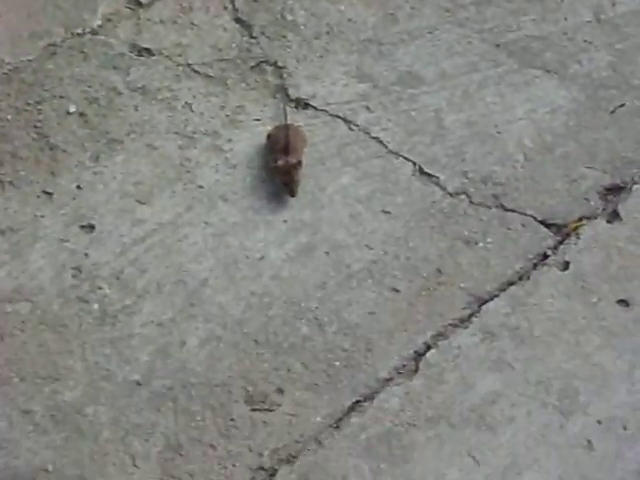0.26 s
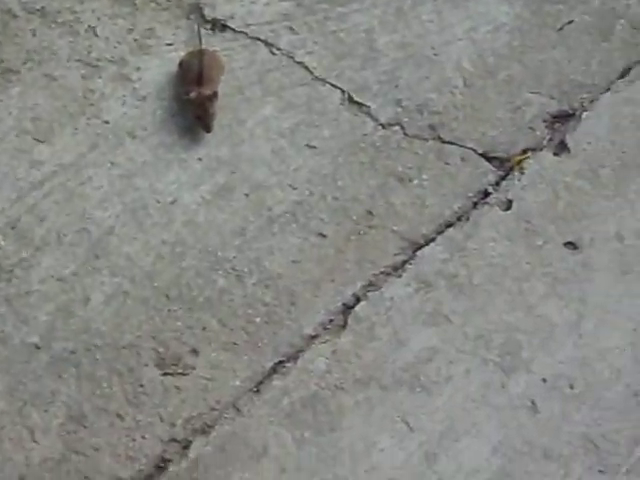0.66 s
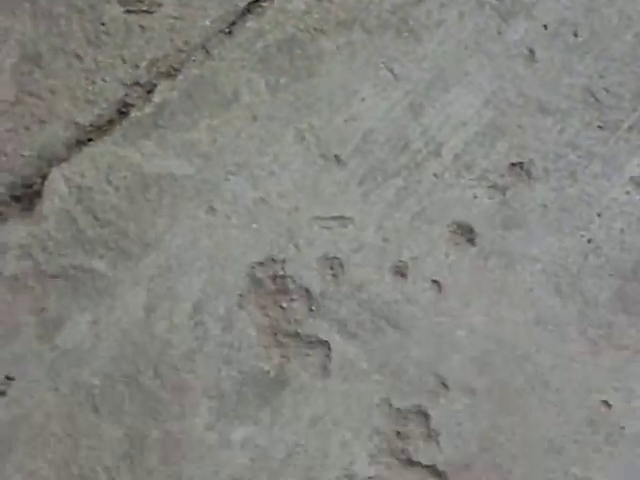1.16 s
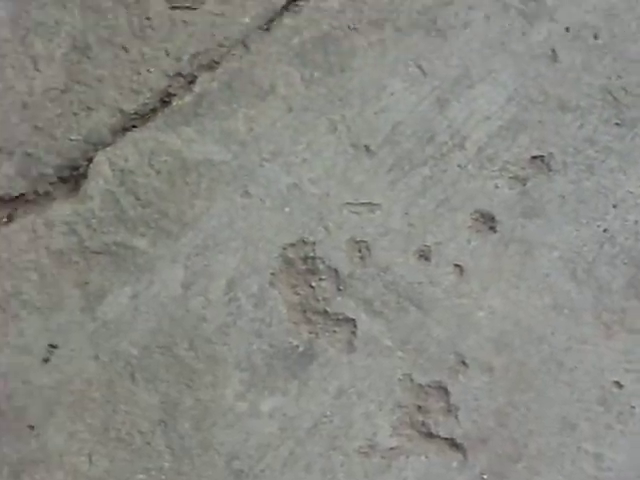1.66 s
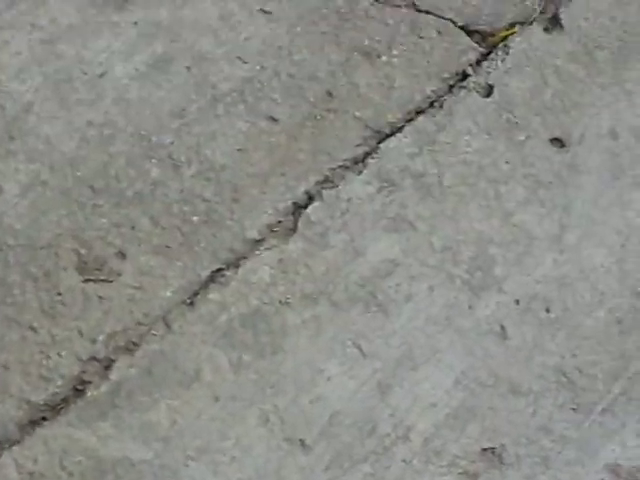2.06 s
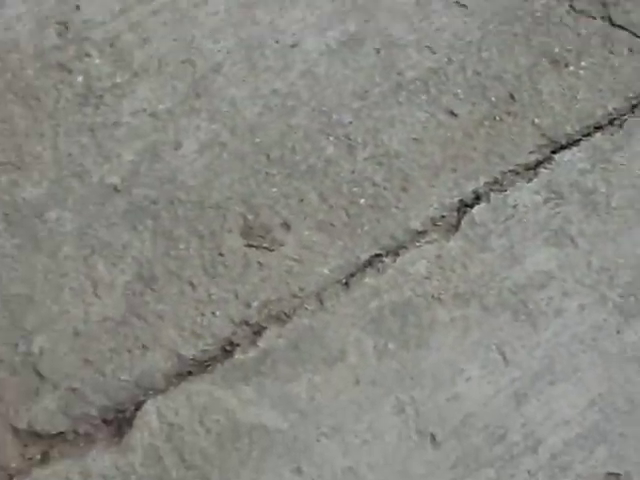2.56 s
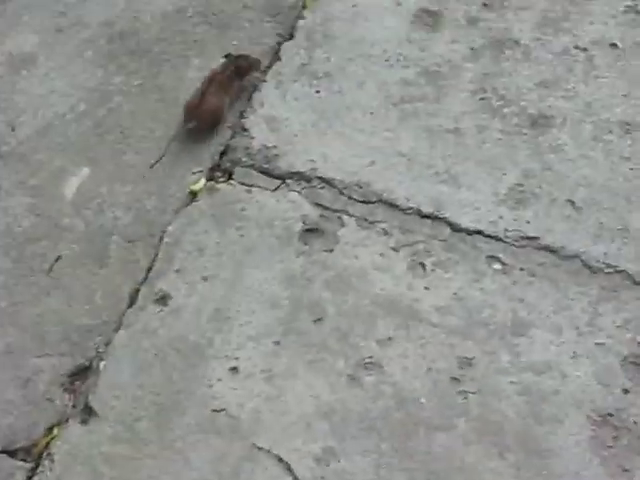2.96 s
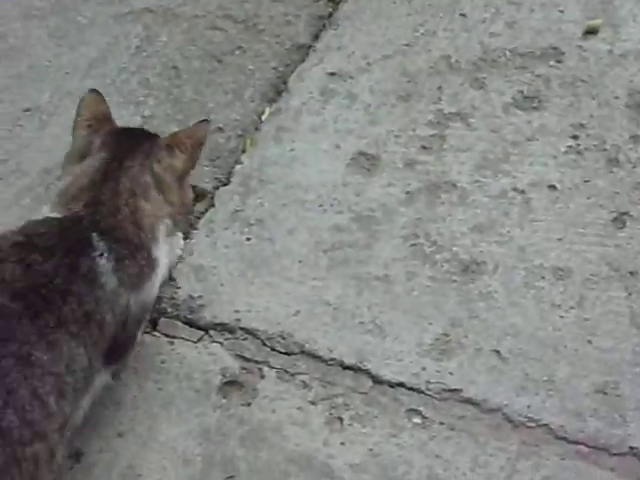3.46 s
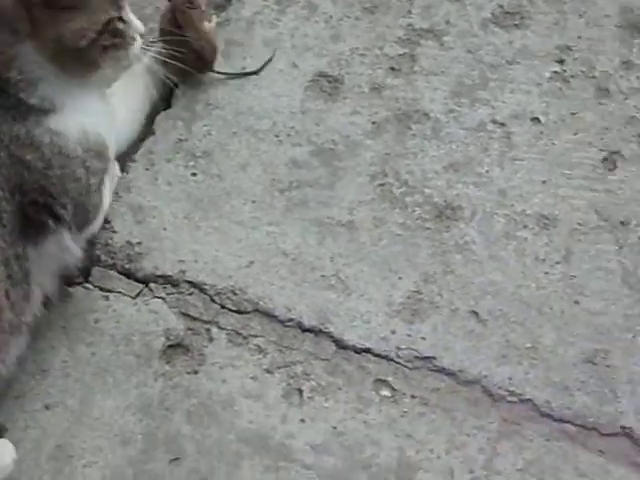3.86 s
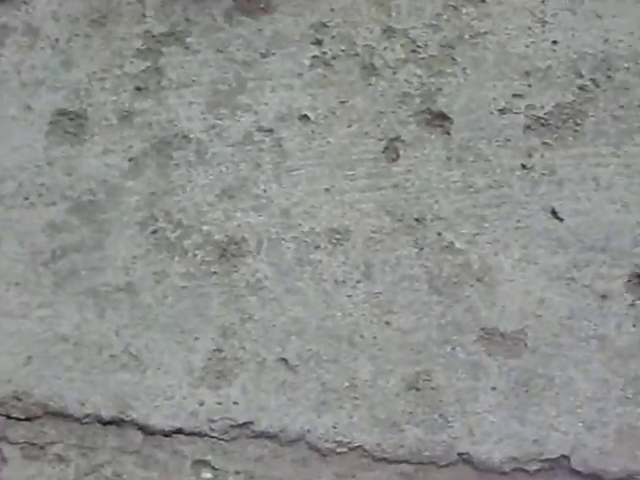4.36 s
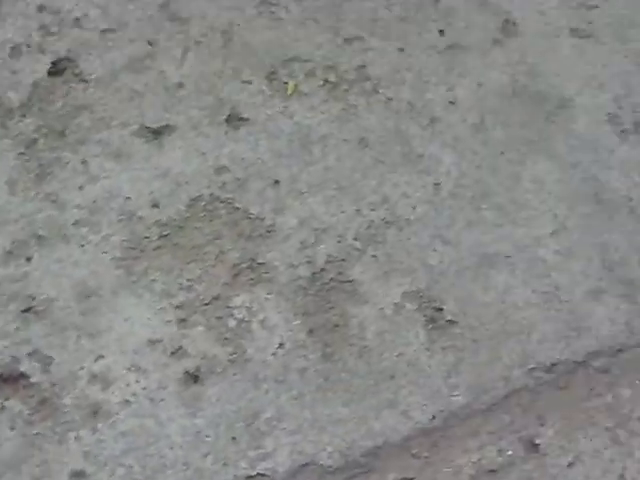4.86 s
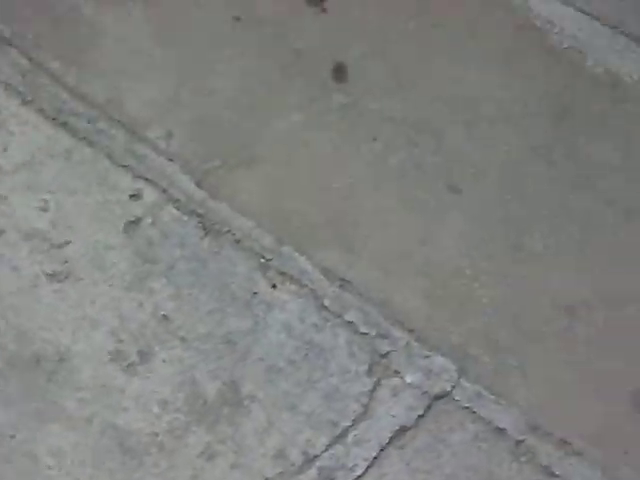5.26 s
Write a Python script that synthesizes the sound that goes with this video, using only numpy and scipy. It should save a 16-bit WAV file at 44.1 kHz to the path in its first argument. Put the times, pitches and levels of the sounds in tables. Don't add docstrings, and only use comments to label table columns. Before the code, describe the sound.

Irregular loud shoe slaps ring off a paved yard in pairs, with faint clicks and gritty scuffs over steady buzzing and soft hiss.

```python
import sys
import numpy as np
from scipy import signal
from scipy.fft import rfft, irfft
from scipy.io import wavfile
from scipy.ndimage import uniform_filter1d

SR = 44100
rng = np.random.default_rng(int(sys.argv[2]) if len(sys.argv) > 2 else 0)


def magnitude_from_level(level_db):
    exponent = np.asarray(level_db, float) / 20
    return 10 ** exponent


def file_out(sig):
    cols = np.atleast_2d(sig).T
    lim = np.clip(cols, -1, 1)
    pcm = np.round(lim * 32767).astype(np.int16)
    wavfile.write(sys.argv[1], SR, pcm)


N = 242991

# centre [Hz], width [Hz].
HOLLOWS = [
    (283, 314),
    (606, 370),
    (4346, 1500),
    (156, 210),
]
CONTACT_MS = [4.8, 3.0, 1.3]


def evened(x):
    return x / np.sqrt(np.mean(x ** 2) + 1e-20)


def peaked(x):
    return x / abs(x).max()


def read_curve(points, hz):
    f, value = np.transpose(points)
    return np.interp(np.log(hz + 1), np.log(f + 1), value)


def add(mix, s, sound):
    part = mix[round(s * SR):][:len(sound)]
    part += sound[:len(part)]


def ring(x, hz, width):
    r = np.exp(-np.pi * width / SR)
    return signal.lfilter([1, 0, -1], [1, -2 * r * np.cos(2 * np.pi * hz / SR), r * r], x)


def mode(x, hz, width):
    return ring(ring(x, hz, width), hz, 2 * width)


def even_coloured(x):
    z = rfft(x)
    return irfft(z / np.sqrt(uniform_filter1d(abs(z) ** 2, size=9)), len(x))


def knocks(rows, ms, width, echoes, fade, rattle_db, thud_db, bounce_db=-60):
    direct, spray = np.zeros(N), np.zeros(N)
    t = np.arange(1300) / SR
    u = t / (ms / 1000)
    start = np.minimum(t / 0.00014, 1)
    shape = start * (np.exp(-fade * u - u ** 6) + magnitude_from_level(rattle_db - 60 * t / 0.097))
    shape = shape + magnitude_from_level(bounce_db) * np.exp(-((t - 0.007) / 0.0018) ** 2)
    gate = start * magnitude_from_level(-60 * t / 0.043)
    heel, (usual_hz, arch_width), edge, thud = HOLLOWS
    noises = rng.standard_normal((len(rows), 1300))
    for row, noise, echo in zip(rows, noises, echoes * np.ones((len(rows), 3))):
        s, db, hz, arch_hz, *hollow_db = row
        hollows = [heel, (arch_hz, arch_width * arch_hz / usual_hz), edge, thud]
        levels = hollow_db + [hollow_db[0] + thud_db]
        force = gate * even_coloured(noise * shape)
        knock = peaked(mode(force, hz, width))
        for (f, w), level in zip(hollows, levels):
            knock = knock + magnitude_from_level(level) * peaked(mode(force, f, w))
        add(direct, s, magnitude_from_level(db) * knock)
        echo_db, arch_db, main_db = echo
        click = t == 0
        pulse = click + magnitude_from_level(arch_db) * peaked(ring(click, arch_hz, 370))
        pulse = pulse + magnitude_from_level(main_db) * peaked(ring(click, hz, 1200))
        add(spray, s, magnitude_from_level(db + echo_db) * pulse)
    return np.array([direct, spray])


def slaps():
    # start [s], peak [dB], main ring [Hz], arch hollow [Hz], edge snap against the ring [dB].
    slap_table = [
        (0.7466, -7, 1670, 350, -0.5),
        (0.9747, -0.5, 2060, 296, -4.5),
        (2.086, -3.5, 1780, 240, -3),
        (2.3655, 0, 2570, 596, -8),
        (3.8064, -3, 2376, 542, -14),
        (4.07, -2, 2100, 330, -6.5),
        (4.3213, -17, 1570, 810, 4.5),
        (4.9638, -20.5, 2370, 390, -2.5),
    ]
    rows, echoes = [], []
    for s, db, hz, arch_hz, snap_db in slap_table:
        octaves = np.log2(arch_hz / HOLLOWS[1][0])
        rows.append((s, db, hz, arch_hz, -13.5, -6 + 12.5 * octaves, snap_db))
        echoes.append((5.5, -22.5 + 9.5 * octaves, -28 - 9.5 * octaves))
    return magnitude_from_level(1.5) * knocks(rows, CONTACT_MS[0], width=910, echoes=echoes, fade=0.77,
                             rattle_db=-31.5, thud_db=-9.5)


def touches():
    # start [s], peak [dB], then heel hollow, arch hollow and edge snap against the ring [dB].
    touch_table = [(0.7305, -29.5, 5, -9, 10), (.9616, -21.5, 3, -15, 1), (2.0697, -17.5, -7, -15, 0.5),
                   (2.1787, -22.5, -9.5, 4, -8), (2.1855, -36, -3, 3.5, -7), (2.1876, -28, 5.5, -6, 7.5),
                   (2.3533, -16, -7.5, 1, 2), (3.5161, -29, -1, -6.5, -25), (3.5315, -40.5, 8, -4, -3),
                   (3.793, -22.5, -7.5, 3, 3), (3.9205, -37.5, -15, 0, -14), (4.0562, -17, -2.5, 5, 0),
                   (4.3078, -25, -4.5, 2, -1), (4.3185, -39.5, -2, 16.5, -25), (4.9432, -51.5, -3, -4, 13)]
    rows = [(s, db, 2140, HOLLOWS[1][0], *hollow_db) for s, db, *hollow_db in touch_table]
    return knocks(rows, CONTACT_MS[1], width=580, echoes=[(0, -27, -27.5)], fade=0.47,
                  rattle_db=-10.0, thud_db=-11.5, bounce_db=-7.5)


def ticks():
    # start [s], peak [dB], then heel hollow, arch hollow and edge snap against the ring [dB].
    tick_table = [(0.6887, -42, -14, -5, -4), (1.3408, -53.5, -13, -16, 9.5), (1.5166, -28, -1, -4, -11),
                  (1.535, -38, -25, -15, -20), (1.5903, -21.5, -51, -9, -14), (2.002, -41, -28, -29, -8),
                  (2.2136, -15.5, -30, -8, -9), (2.2796, -34.5, -10.5, -16, -13),
                  (2.5841, -36, -10, -17, -4), (2.7309, -37, -3, -1, -20), (2.8048, -43, 4, -30, -1.5),
                  (2.8524, -42.5, -1, -23, -7), (2.8769, -51, 3, 8.5, -14), (3.0173, -62, 8, -2, -16),
                  (3.1426, -37.5, -3.5, -14, -31.5), (3.1768, -50, 11, 2, -23), (3.707, -24, -30, -16, 0.5),
                  (3.9203, -40, 2, 3, -25), (4.0311, -35.5, -27.5, -27.5, 2.5), (4.7535, -52, -8, -10, 1.5)]
    rows = [(s, db, 2137, HOLLOWS[1][0], *hollow_db) for s, db, *hollow_db in tick_table]
    return magnitude_from_level(3.5) * knocks(rows, CONTACT_MS[2], width=1230, echoes=[(-13, -22, -21.5)], fade=0.47,
                             rattle_db=-22, thud_db=-9.5)


def scuffs():
    # centre [Hz], width [Hz], level [dB].
    grit = [
        (2100, 920, 3),
        (4250, 2930, 11.5),
        (800, 190, -10),
    ]
    # middle [s], length [s], level [dB], brightness [dB].
    scuff_table = [(0.325, .1, -74, -1), (1.22, 0.016, -63.5, -1), (2.74, 0.03, -47, -15.5),
                   (2.877, 0.035, -61.5, -6), (2.96, 0.042, -61, -8.5), (3.103, 0.03, -59.5, -0.5),
                   (3.154, 0.023, -60.5, -14.5), (3.278, 0.011, -51.5, -25), (3.649, 0.067, -83.5, 7),
                   (4.961, 0.042, -54.5, -10), (5.087, 0.042, -59.5, -13.5), (5.24, .06, -86.5, 18),
                   (5.311, 0.043, -45.5, -2.5)]
    grain_size = np.minimum(rng.exponential(1, N // 40 + 1), 2.5)
    grains = rng.standard_normal(N) * magnitude_from_level(4.2 * grain_size.repeat(40)[:N])
    low, high, body = (magnitude_from_level(db) * evened(mode(grains, hz, width)) for hz, width, db in grit)
    out, t = np.zeros(N), np.arange(N) / SR
    for s, length, db, bright_db in scuff_table:
        swell = np.exp(-abs(2 * (t - s) / length) ** 3)
        out += magnitude_from_level(db) * swell * (low + body + magnitude_from_level(bright_db) * high)
    return out


def yard(x, count=3):
    # frequency [Hz], time to fall 60 dB [s].
    yard_decay = [(150, 0.75), (400, 0.29), (900, 0.33), (2000, 0.38), (4000, 0.3), (6000, 0.28)]
    # frequency [Hz], level [dB].
    yard_colour = [(100, -4), (300, 2.5), (800, 8.5), (1300, -1.5), (2300, -0.5), (3500, 1), (5500, -4.5)]
    out = np.zeros(N)
    place = (np.arange(N) / SR / 0.26).astype(int) % count
    hz, t = np.fft.rfftfreq(256, 1 / SR), np.arange(600) * 64 / SR
    decay_db = read_curve(yard_colour, hz)[:, None] - 60 * t / read_curve(yard_decay, hz)[:, None]
    for k in range(count):
        a, b, lumps = rng.standard_normal((600, 129, 3)).T
        lumps = evened(uniform_filter1d(uniform_filter1d(lumps, size=6, axis=0), size=5, axis=1))
        tail = signal.istft((a + 1j * b) * magnitude_from_level(decay_db + 2.0 * lumps), nperseg=256, noverlap=192)[1]
        s = np.arange(len(tail)) / SR
        tail *= np.clip((s - 0.00077) / 0.0035, 0, 1)
        tail *= magnitude_from_level(1.5 * np.exp(-((s - 0.037) / 0.012) ** 2))
        out += signal.fftconvolve(x * (place == k), tail / np.linalg.norm(tail))[:N]
    return out


def frame_buzz():
    load_at = [.225, .3, .47, .55, .6, .77, .84]
    load_step = [-5.2, 3.1, -2.1, 3.9, 3.1, 1.8, -4.6]
    # middle [share of frame], half width [share of frame], level [dB].
    chatter_spells = [(0.249, 0.026, -55), (0.48, 0.11, -50), (.78, 0.14, -54.5)]
    frame_hz = 29.963
    frames = np.arange(int(N / SR * frame_hz) + 1)[:, None]
    chance = rng.standard_normal((len(frames), 2 * len(load_at)))
    at = (frames + load_at + 0.014 * chance[:, ::2]) / frame_hz * SR
    steps = np.zeros(N + SR)
    np.add.at(steps, at.astype(int), np.array(load_step) / 1000 * (1 + 0.2 * chance[:, 1::2]))
    sag = signal.lfilter([1], [1, -np.exp(-2 * np.pi * 5 / SR)], steps[:N])
    sag = signal.lfilter(*signal.butter(2, 800, fs=SR), sag)
    share = np.arange(N) / SR * frame_hz % 1
    busy = sum(magnitude_from_level(db) * np.exp(-((share - mid) / half) ** 2) for mid, half, db in chatter_spells)
    band = signal.butter(3, [220, 1150], "band", fs=SR, output="sos")
    chatter = signal.sosfilt(band, rng.standard_normal(N))
    return magnitude_from_level(1.0) * sag + busy * evened(chatter)


def hiss():
    # frequency [Hz], level per Hz [dB].
    hiss_colour = [(30, -17), (60, -15), (200, -10.5), (450, -17), (1000, -24.5), (2550, -28), (4750, -33),
                   (6500, -32.5)]
    # time [s], level [dB].
    air_drift = [(0, -2), (1.301, 0.5), (2.6, -2), (3.403, -4.5), (4.6, -3), (5.5, -3)]
    hz = np.fft.rfftfreq(1024, 1 / SR)
    a, b, patches = rng.standard_normal((N // 256 + 5, 513, 3)).T
    patches = evened(uniform_filter1d(uniform_filter1d(patches, 14, 0), 14, 1))
    z = (a + 1j * b) * magnitude_from_level(read_curve(hiss_colour, hz)[:, None] + 0.16 * patches)
    steady = magnitude_from_level(-51) * evened(signal.istft(z, nperseg=1024, noverlap=768)[1][:N])
    return steady * magnitude_from_level(np.interp(np.arange(N) / SR, *np.transpose(air_drift)))


def scene():
    direct, spray = slaps() + touches() + ticks()
    drag = scuffs()
    echoes = magnitude_from_level(0.5) * yard(spray + magnitude_from_level(-9.0) * drag)
    return (direct + drag + echoes + frame_buzz() + hiss())[None]


def band_limit(x):
    return signal.sosfilt(signal.butter(12, 16820, fs=SR, output="sos"), x)


def record(dry):
    treble_cut = signal.firwin(121, 5500, window=("kaiser", 9), fs=SR)
    narrow = signal.oaconvolve(dry, treble_cut[None], "same")
    clipped = np.clip(narrow, -0.72, 0.72)
    top_cut = signal.firwin(201, 16300, window=("kaiser", 9), fs=SR)
    mix = signal.oaconvolve(clipped, top_cut[None], "same")
    return band_limit(mix)


dry = scene()
out = record(dry)
file_out(out)
```